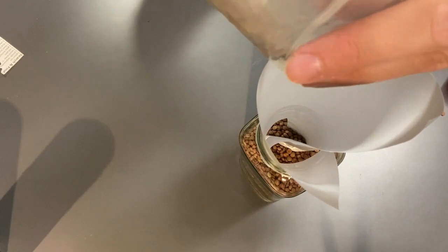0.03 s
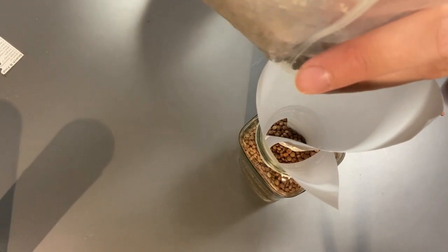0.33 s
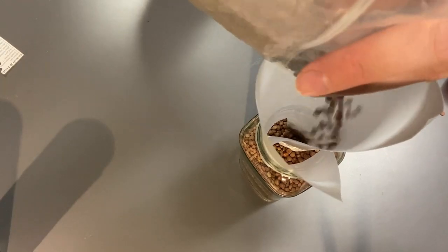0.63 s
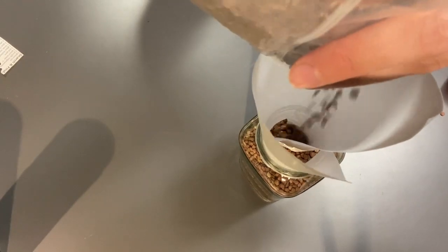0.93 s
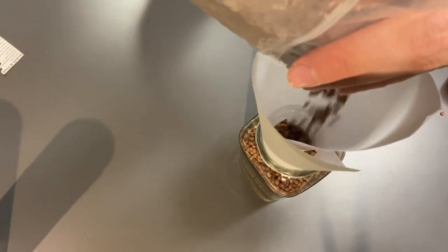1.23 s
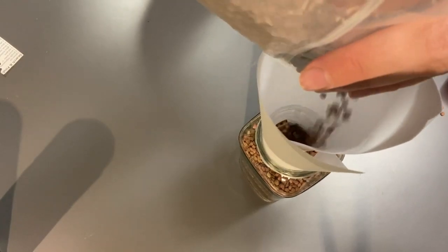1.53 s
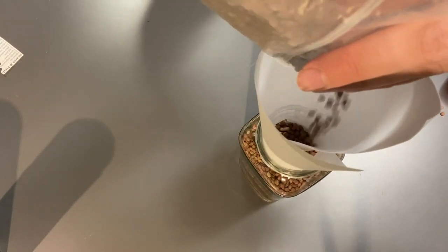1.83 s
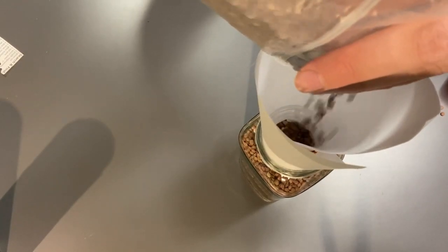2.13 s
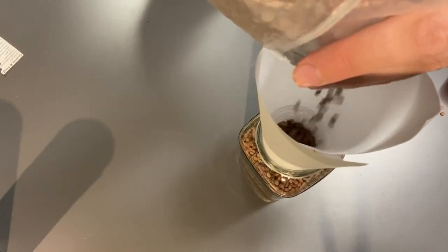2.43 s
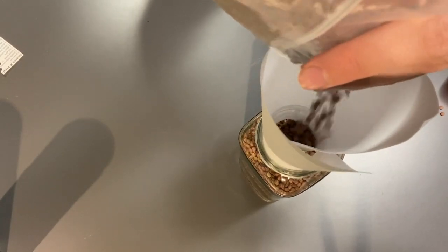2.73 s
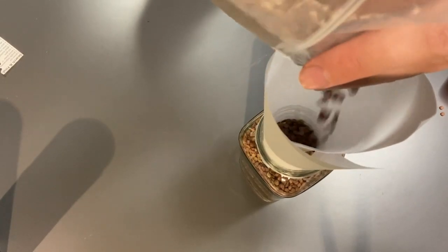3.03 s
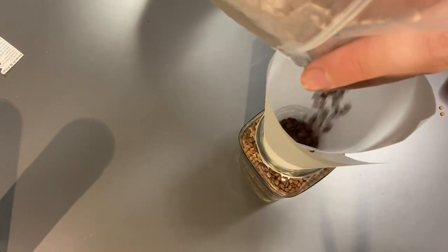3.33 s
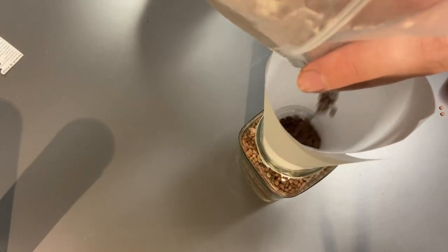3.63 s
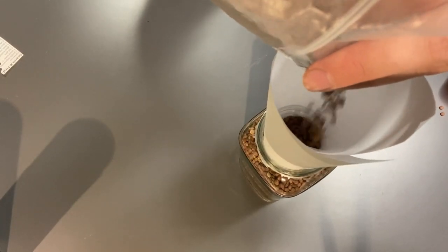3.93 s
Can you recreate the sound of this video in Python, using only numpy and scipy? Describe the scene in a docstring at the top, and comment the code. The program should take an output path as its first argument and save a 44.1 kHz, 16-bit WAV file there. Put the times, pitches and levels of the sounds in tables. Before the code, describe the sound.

Dry grains pour through a paper funnel into a glass jar with an uneven, rattling patter.

```python
"""Dry grains slide and rustle in a bag; from half a second on they patter into a paper funnel.
The funnel stands in a nearly full glass jar, close by in a small room with a low rumble.
The uneven stream, with clumps, knocks and ringing taps, excites the paper and the jar mouth.
As grains heap up in the throat, the bright rattle fades and the funnel sounds deeper and ticks."""
import sys
import numpy as np
from scipy import signal
from scipy.fft import rfft, irfft
from scipy.io import wavfile

SR = 44100
rng = np.random.default_rng(int(sys.argv[2]) if len(sys.argv) > 2 else 0)


def wav_out(sig):
    """Save sig, one row per channel (or a flat mono array), as 16-bit PCM at SR to the path in sys.argv[1]."""
    wavfile.write(sys.argv[1], SR, np.round(np.clip(np.atleast_2d(sig).T, -1, 1) * 32767).astype(np.int16))


N = 176400
TIME_S = np.arange(N) / SR
SIDES = np.array([[.5], [-.5]])  # splits a left-minus-right value

# stream strength: (time [s], relative level [dB])
FLOW_LEVEL = [(0, -39), (.54, -40), (.62, -28.5), (.7, -23), (.745, -23.5), (.81, -20.5), (.91, -24.5),
              (.97, -19.5), (1.015, -21), (1.04, -31), (1.205, -29), (1.23, -22.5), (1.32, -23.5),
              (1.4, -21.5), (1.55, -23), (1.66, -21), (1.73, -24.5), (1.81, -24), (1.84, -28.5),
              (1.93, -30), (1.95, -24.5), (2.02, -26.5), (2.24, -26), (2.275, -32.5), (2.32, -28.5),
              (2.4, -28.5), (2.5, -28.5), (2.56, -27), (2.75, -29.5), (2.86, -25.5), (2.91, -27),
              (2.97, -25), (3.04, -24), (3.1, -28.5), (3.2, -24.5), (3.28, -29), (3.33, -29), (3.55, -26.5),
              (3.63, -26.5), (3.7, -25.5), (3.78, -30.5), (3.86, -29), (3.92, -32.5), (4, -30)]
# grain on paper: (frequency [Hz], relative level [dB])
PAPER_TONE = [(100, -51), (300, -26.5), (600, -22.5), (900, -13), (1200, -0.8), (1460, -0.1), (1680, 0.5),
              (1900, 0.5), (2150, -0.3), (2450, -0.95), (3300, -6), (4300, -11), (5200, -9), (6100, -5.5),
              (7200, -9), (8000, -7.5), (9500, -9), (11500, -10.5), (13500, -13), (16000, -16.5)]
# funnel and jar mouth: (frequency [Hz], width [Hz], gain [linear])
FUNNEL_MODES = [(670, 20, 0.89), (917, 24, 0.48), (1135, 12, 0.3), (1276, 43, 0.5), (1610, 46.7, 0.42),
                (1782, 59, 0.44), (2070, 30, 0.4), (2394, 62, 0.67), (2850, 29, 0.49), (3010, 54, 0.57),
                (3150, 110, 0.37), (3602, 75, 1.23), (3880, 130, 0.48), (4360, 76, 0.56), (4740, 170, 0.7),
                (5070, 100, 1.2)]
def pour(gain_db=-4):
    """Stream and clumps strike the paper; funnel and jar mouth resonate."""
    grains = np.hstack([clumps(), stream(FLOW_LEVEL, per_s=1150, spread_db=4)])
    patter = through(landings(*grains), tone(PAPER_TONE))
    impacts = patter + hollow(grains) + rattle(grains) + ticks(grains)
    return from_db(gain_db) * (resonate(impacts, FUNNEL_MODES) + cone_ring(patter))


# grains landing together: (time [s], relative level [dB], length [s])
GRAIN_CLUMPS = [(0.135, -18, 0.003), (.556, -20, 0.0024), (.616, -13.5, .003), (.839, -12, 0.01),
                (.872, -11, .014), (.956, -13.5, 0.00434), (1.057, -16, 0.0084), (1.073, -13.5, 0.0047),
                (1.1, -10.5, 0.011), (1.133, -12.5, 0.0089), (1.166, -9.5, 0.0086), (1.193, -13.5, 0.0044),
                (1.211, -12, 0.0024), (1.227, -10.5, 0.01), (1.377, -15, 0.0065), (1.425, -18, 0.0041),
                (1.478, -20, 0.0048), (1.628, -16, 0.0054), (1.76, -15, 0.0086), (1.786, -14, 0.0033),
                (1.875, -12.5, 0.0057), (1.96, -16.5, 0.0083), (1.969, -13, 0.0075), (2.06, -14, 0.013),
                (2.078, -12, 0.017), (2.092, -29, 0.0028), (2.201, -13, 0.002), (2.287, -14.5, 0.0032),
                (2.294, -12.5, 0.0055), (2.306, -13.5, 0.0078), (2.345, -14, 0.0088), (2.424, -14, 0.0056),
                (2.462, -16.5, 0.0028), (2.477, -13.5, 0.0071), (2.494, -13.5, 0.0033),
                (2.506, -11.5, 0.0095), (2.537, -14.5, 0.0077), (2.57, -16, .004), (2.695, -13, 0.005),
                (2.714, -18, 0.0038), (2.732, -15, 0.0069), (2.773, -11.5, 0.023), (2.806, -12.5, 0.00795),
                (2.872, -14, 0.0059), (2.891, -17, 0.0055), (2.926, -15.5, .01), (3.005, -17, 0.01),
                (3.106, -15.5, 0.0017), (3.226, -14.5, 0.011), (3.343, -17, 0.006), (3.382, -20, 0.0037),
                (3.412, -16, 0.0028), (3.435, -20, 0.0051), (3.451, -19, 0.0027), (3.513, -15.5, 0.0054),
                (3.543, -15, 0.0039), (3.718, -21, 0.0067), (3.867, -16, 0.014), (3.879, -15.5, 0.0069),
                (3.943, -17.5, 0.003), (3.953, -15.5, 0.013)]
def clumps(count=6, gain_db=5.5, leader_db=7.5, rise_db=1.5):
    """Times and strengths: one hard leading grain, then a quick run of softer ones."""
    start, db, length = np.transpose(GRAIN_CLUMPS)[:, :, None]
    order = np.arange(count)
    leader = order == 0
    lag = (order + rng.uniform(-.5, .5, (len(start), count))) * ~leader / count
    height = from_db(db + gain_db + leader_db * leader + rise_db * lag)
    return (start + length * lag).ravel(), height.ravel()


def stream(level, per_s, spread_db):
    """Times and strengths of irregular grains whose rms follows a level curve."""
    count = int(per_s * N / SR)
    s = np.abs(np.arange(count) + rng.uniform(-1, 1, count)) / per_s
    height = from_db(spread_db * np.minimum(rng.exponential(size=count), 3))
    return s, height * from_db(at_time(level, s)) * np.sqrt(SR / per_s / np.mean(height ** 2))


def landings(s, height, count=64, size=768):
    """Grains hit random spots, each with its own crack, ring and ping. Rows: direct, echoes L and R."""
    crack_s, ring_s, ping_s = .0003, .0022, .0046
    t = np.arange(size) / SR
    cracks, rings = rng.standard_normal((2, count, size))
    cracks *= np.exp(-t / crack_s)
    rings = butter(rings * np.exp(-t / ring_s), "low", hz=4860, order=1)
    ping_hz = np.geomspace(1306, 4200, count)[:, None]
    pings = np.sin(2 * np.pi * ping_hz * t) * np.exp(-t / ping_s)
    hits = unit(cracks) + .5 * unit(rings) + from_db(-13.5) * unit(pings)
    colour_hz, colour_db = np.geomspace(500, 16000, 9), rng.normal(0, 2.5, (count, 9))
    spots = unit(through(hits, [tone(np.c_[colour_hz, db], size) for db in colour_db]))
    direct = np.zeros(N + size)
    for i, gain in zip(to_samples(s), height):
        direct[i:i + size] += gain * spots[rng.integers(count)]
    return np.vstack([direct[:N], reflections(s, height)])


# loaded funnel: (time [s], level re patter [dB])
HOLLOW_LEVEL = [(0, -4), (.55, -7), (.68, -11), (1.7, -8), (2.4, -9), (2.7, -10), (2.9, -5), (3.4, -4.5),
                (4, -2)]
# (frequency [Hz], relative level [dB])
HOLLOW_SPECTRUM = [(100, -23), (350, -12.5), (550, -7), (690, -2), (820, 0), (980, 2), (1170, 3),
                   (1400, -8.5), (3000, -30.5), (16000, -16.5)]
def hollow(grains):
    """The loaded funnel answers each grain with a hollow knock."""
    return layer(grains, HOLLOW_LEVEL, HOLLOW_SPECTRUM)


# heavy landings: (time [s], relative level [dB])
HEAP_KNOCKS = [(.567, -15), (2.808, -17), (3.226, -25), (3.256, -15.5), (3.383, -38), (3.435, -22),
               (3.716, -16), (3.866, -19), (3.948, -34)]
def knocks(count=5, length_s=.00478, gain_db=5):
    """A bunch of grains drops on the heap and thumps the cone."""
    s, db = np.repeat(HEAP_KNOCKS, count, axis=0).T
    s += length_s * rng.random(len(s))
    return through(landings(s, from_db(db + gain_db)), tone(HOLLOW_SPECTRUM))


# grains in the jar: (time [s], level re patter [dB])
RATTLE_LEVEL = [(0, -6.5), (.6, -6.5), (.85, -8), (1.4, -5), (1.8, -9), (2.1, -7.5), (2.7, -9), (3.1, -10),
                (4, -30)]
# (frequency [Hz], relative level [dB])
RATTLE_SPECTRUM = [(300, -44), (1800, -5), (2400, -10.5), (2900, 2), (3150, 1.5), (3400, 1.5), (3600, -4.5),
                   (4300, -8), (5000, -6.5), (7000, -28.5), (16000, -43)]
def rattle(grains):
    """Grains drop into the jar and rattle brightly while the throat is open."""
    return layer(grains, RATTLE_LEVEL, RATTLE_SPECTRUM)


# grain on grain: (time [s], level re patter [dB])
TICK_LEVEL = [(0, -34), (1.5, -43), (2.5, -41), (3.2, -10.5), (4, -1)]
# (frequency [Hz], relative level [dB])
TICK_SPECTRUM = [(300, -33), (2000, -9), (4300, -1), (7000, -7), (10000, -4), (16000, -8)]
def ticks(grains):
    """Grains tick finely on the growing heap."""
    return layer(grains, TICK_LEVEL, TICK_SPECTRUM)


# cone resonance: (time [s], relative level [dB])
CONE_LEVEL = [(0, -24), (.55, -2), (.68, -3), (1, -6), (1.3, -5.5), (1.8, -22), (2.7, -9), (3.05, -10),
              (3.5, -14), (4, -13)]
def cone_ring(patter):
    """The patter rings one mode of the cone, most while it is still empty."""
    ring = mode(patter, hz=1231, width_hz=54)
    return .5 * from_db(at_time(CONE_LEVEL, TIME_S)) * ring * patter.std() / ring.std()


# hits on taut paper: (time [s], pitch [Hz], relative level [dB])
PAPER_TAPS = [(0.134, 1460, -25), (0.133, 1680, -26), (.566, 1200, -21), (0.612, 1530, -22),
              (0.614, 2960, -28), (0.705, 1137, -16.5), (0.806, 2530, -22), (.838, 1990, -19),
              (.841, 2910, -11), (.993, 3630, -22), (1.013, 1280, -16), (1.19, 1580, -20),
              (1.229, 3620, -17), (1.376, 3120, -18), (1.422, 1420, -16), (1.477, 2810, -17),
              (1.594, 2980, -19), (1.627, 2340, -23), (1.779, 3030, -21), (1.785, 1285, -20),
              (1.808, 2520, -15), (1.967, 2710, -25), (2.162, 3165, -22), (2.289, 2840, -27),
              (2.304, 1635, -26), (2.347, 1180, -23), (2.476, 1600, -20), (2.476, 684, -29),
              (2.505, 2830, -24), (2.537, 1274, -27), (2.693, 1194, -23), (2.731, 2470, -19),
              (2.805, 1700, -20), (2.87, 1760, -18), (2.884, 2820, -23), (2.891, 685, -26),
              (2.926, 3270, -20), (2.960, 720, -22.5), (3.005, 2410, -27), (3.041, 1210, -23),
              (3.106, 1210, -29), (3.229, 1660, -23), (3.256, 804, -27), (3.257, 960, -28),
              (3.343, 2500, -28), (3.344, 1120, -26), (3.349, 1030, -23), (3.381, 1230, -19.5),
              (3.449, 1030, -21), (3.541, 2330, -22), (3.678, 1290, -28), (3.698, 1260, -18.5),
              (3.719, 950, -26), (3.856, 1205, -22), (3.871, 914, -20), (3.879, 1770, -21),
              (3.953, 967, -24)]
def taps(ring_s=.0075, attack_s=.00042, gain_db=-1, echo_db=-6.5, size=4096):
    """A grain hits a taut spot, which rings briefly. Rows: direct, echoes L and R."""
    t, out = np.arange(size) / SR, np.zeros((3, N + size))
    envelope = np.exp(-t / ring_s) * (1 - np.exp(-t / attack_s))
    paths = from_db([[0], [echo_db], [echo_db]])
    for s, hz, db in PAPER_TAPS:
        i = int(s * SR)
        ring = envelope * np.sin(2 * np.pi * (hz * t + rng.random((3, 1))))
        out[:, i:i + size] += from_db(db + gain_db) * paths * ring
    return out[:, :N]


# sliding in bag and spout: (time [s], relative level [dB])
SLIDE_LEVEL = [(0, -36.5), (.17, -36.5), (.33, -33), (.42, -35.5), (.56, -34), (.8, -37.5), (2, -41),
               (4, -39.5)]
# (frequency [Hz], relative level [dB])
SLIDE_SPECTRUM = [(80, 6.5), (190, -5.5), (270, 1), (450, 1.5), (660, 1.5), (820, 2.5), (1100, 1),
                  (1650, 0), (2000, -2.5), (3000, -8.5), (5000, -13), (9000, -16.5), (16000, -26)]
# (frequency [Hz], width [Hz], gain [linear])
SLIDE_MODES = [(765, 30, 0.87), (845, 30, 1.17), (1680, 68, 0.97), (3130, 47, 0.7), (3920, 130, 0.43)]
def slide(gain_db=-3):
    """Grains slide over each other in many tiny dull contacts."""
    contacts = landings(*stream(SLIDE_LEVEL, per_s=1600, spread_db=3.5))
    rustle = from_db(gain_db) * through(contacts, tone(SLIDE_SPECTRUM))
    return butter(resonate(rustle, SLIDE_MODES), "high", hz=110)


# scattered echoes: (frequency [Hz], relative level [dB])
ECHO_SPECTRUM = [(100, 0), (350, 6), (700, 0.5), (1300, 2.5), (3000, -7.5), (4500, 8), (6300, 4.5),
                 (8000, 2.5), (9700, 0.5), (12500, -3.5), (14000, -36), (16000, -28)]
def reflections(s, height, near_t60_s=.016, room_t60_s=.068):
    """Funnel and hand, then the faint room, scatter each grain anew for each side."""
    t = np.arange(16384) / SR
    near = from_db(-4.5) * unit(from_db(-60 * t / near_t60_s))
    room = from_db(-41) * unit(from_db(-60 * t / room_t60_s))
    energy = np.bincount(to_samples(s), height ** 2, N + 1)[:N]
    power = np.abs(through(energy, near ** 2 + room ** 2))
    return from_db(-1) * through(np.sqrt(power) * rng.standard_normal((2, N)), tone(ECHO_SPECTRUM))


# direct sound: (frequency [Hz], left lead [rad])
LEFT_LEAD = [(50, .1), (900, .25), (2000, 1), (3400, 1.6), (4000, 1.5), (4400, -2.6), (5400, -3.1),
             (6100, -2.5), (6700, -3.5), (8000, -4.6), (9100, -6.2), (10300, -6.4), (11900, -9.1),
             (13400, -9.6), (15000, -12.4), (16000, -12.5)]
# echoes off hand and table: (left delay [s], right delay [s], level [dB])
NEAR_BOUNCES = [(.0019, 0.001, -16.5), (.0047, 0.004, -43), (.0083, .0097, -31), (0.0154, 0.018, -29)]
def to_stereo(sound):
    """Direct sound reaches the two sides out of step; distinct and scattered echoes add to it."""
    direct, scattered = sound[0], sound[1:]
    hz = np.fft.rfftfreq(2 * N, 1 / SR)
    phase = np.exp(1j * SIDES * at_hz(LEFT_LEAD, hz))
    bounces = sum(from_db(db) * np.exp(-2j * np.pi * np.outer([left_s, right_s], hz))
                  for left_s, right_s, db in NEAR_BOUNCES)
    return irfft(rfft(direct, 2 * N) * phase * (1 + bounces))[:, :N] + scattered


# room noise: (frequency [Hz], relative level [dB])
RUMBLE_SPECTRUM = [(10, -34), (25, -40), (35, -8), (52, 0.5), (80, -4), (110, 0), (155, 5.5), (210, -4.5),
                   (400, -14.5), (1500, -40), (16000, -25)]
# low swells: (time [s], half-width [s], level [dB])
LOW_BOOMS = [(2.105, 0.083, -45.5), (2.9, 0.1, -51)]
def rumble(gain_db=-50.5, boom_hz=105):
    """Steady low room noise, partly common to both sides, with two soft booms."""
    noise = through(rng.standard_normal((3, N)), tone(RUMBLE_SPECTRUM))
    boom = butter(rng.standard_normal(N), "band", hz=[.87 * boom_hz, 1.22 * boom_hz])
    swell = sum(from_db(db) * np.exp(-((TIME_S - s) / width_s) ** 2) for s, width_s, db in LOW_BOOMS)
    return from_db(gain_db) * (.73 * noise[0] + .6 * noise[1:]) + swell * boom / boom.std()


def layer(grains, level, spectrum):
    """Landings coloured by a spectrum and scaled by a level curve."""
    return from_db(at_time(level, TIME_S)) * through(landings(*grains), tone(spectrum))


def resonate(x, modes):
    return x + sum(gain * mode(x, hz, width_hz) for hz, width_hz, gain in modes)


def mode(x, hz, width_hz):
    return signal.lfilter(*signal.iirpeak(hz, hz / width_hz, fs=SR), x)


def butter(x, kind, hz, order=2):
    return signal.sosfilt(signal.butter(order, hz, kind, fs=SR, output="sos"), x)


def tone(points, size=4096):
    """Minimum-phase response with the given spectrum, energy 1."""
    gain = from_db(at_hz(points, np.fft.rfftfreq(size, 1 / SR)))
    cepstrum = irfft(np.log(gain))
    cepstrum[1:size // 2] *= 2
    cepstrum[size // 2 + 1:] = 0
    return unit(irfft(np.exp(rfft(cepstrum))))


def through(x, response):
    return signal.fftconvolve(np.atleast_2d(x), np.atleast_2d(response), axes=-1)[:, :np.shape(x)[-1]]


def unit(x):
    """Scale to energy 1."""
    return x / np.sqrt(np.sum(x ** 2, axis=-1, keepdims=True) + 1e-20)


def from_db(db):
    return 10 ** (np.asarray(db) / 20)


def to_samples(s):
    return np.clip(s * SR, 0, N).astype(int)


def at_time(points, s):
    return np.interp(s, *np.transpose(points))


def at_hz(points, hz):
    knots_hz, value = np.transpose(points)
    return np.interp(np.log(hz + 1), np.log(knots_hz), value)


# stereo balance: (frequency [Hz], left minus right [dB])
BALANCE = [(60, 0), (300, 2), (700, 0.5), (1050, 2), (1280, 1.5), (1430, 4.5), (1700, -0.5), (2400, 0.5),
           (2900, 3.5), (4800, 2.5), (5900, 1.5), (6700, 3.5), (8500, 0), (16000, 0)]
def scene(slide_left_db=6.5):
    """Funnel, sliding grains toward the left and room noise, coloured per side."""
    funnel = to_stereo(pour() + knocks() + taps())
    rustle = to_stereo(slide()) * from_db(SIDES * slide_left_db)
    balance = from_db(SIDES * at_hz(BALANCE, np.fft.rfftfreq(2 * N, 1 / SR)))
    return irfft(rfft(funnel + rustle + rumble(), 2 * N) * balance)[:, :N]


def record(dry, top_hz=15900):
    """Low cut, soft clip, steep high cut."""
    rounded = np.tanh(butter(dry, "high", hz=32, order=4))
    return signal.sosfilt(signal.ellip(12, .1, 80, top_hz, fs=SR, output="sos"), rounded)


dry = scene()
out = record(dry)
wav_out(out)
```